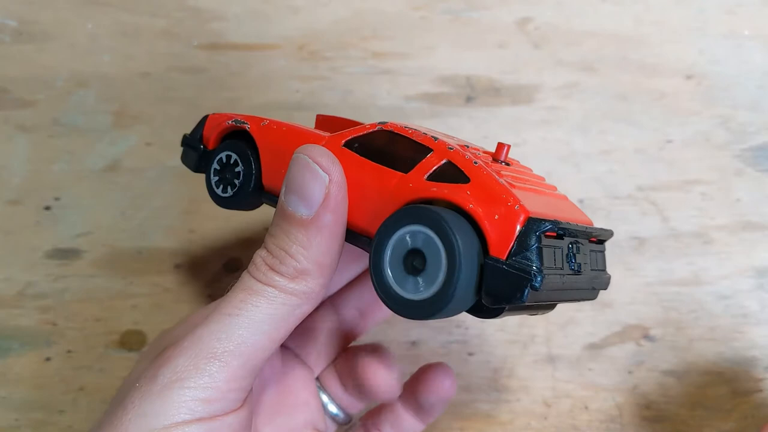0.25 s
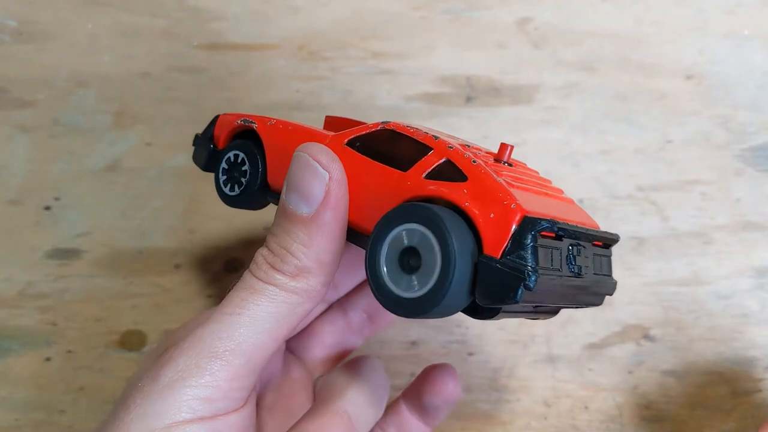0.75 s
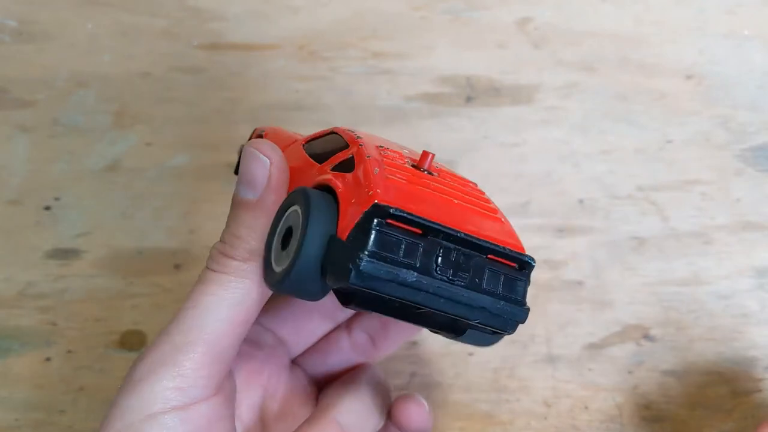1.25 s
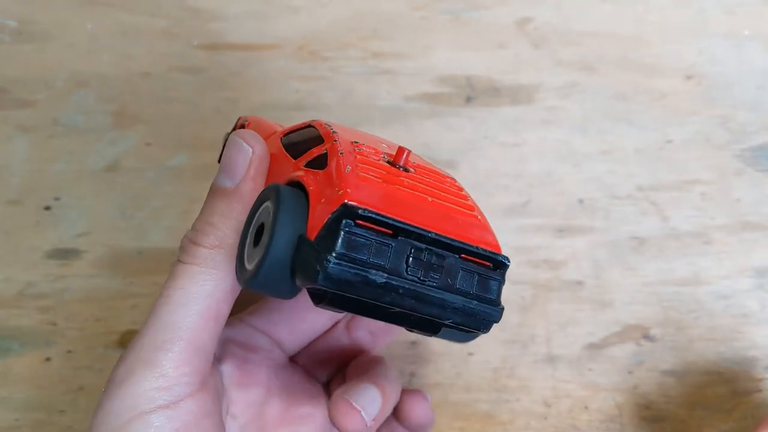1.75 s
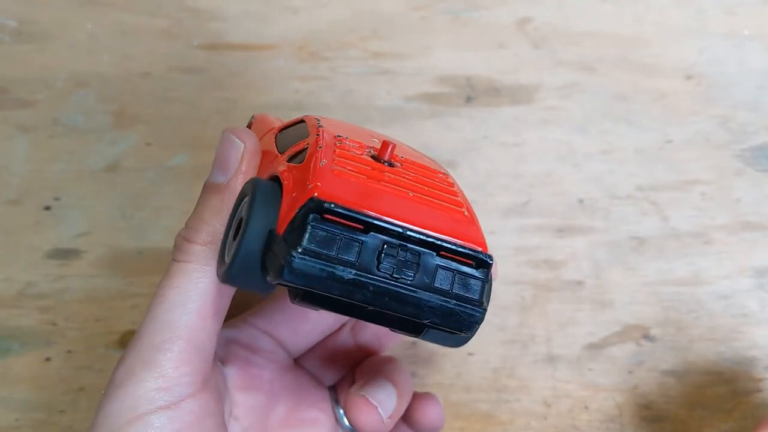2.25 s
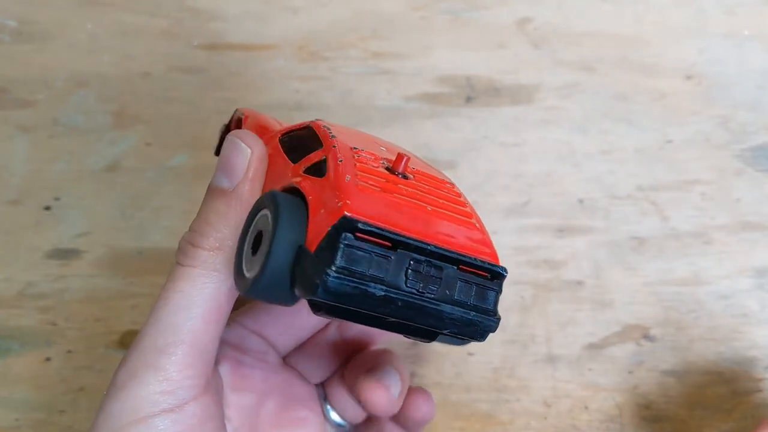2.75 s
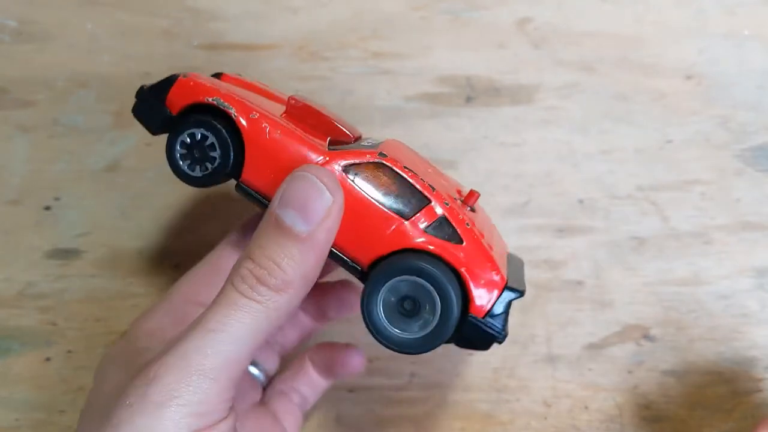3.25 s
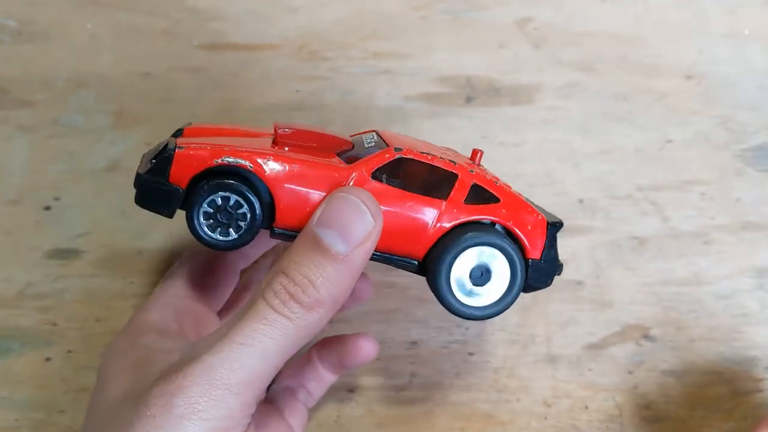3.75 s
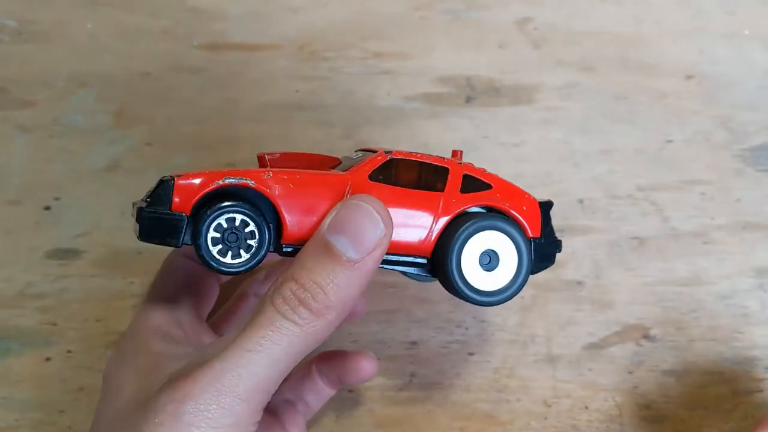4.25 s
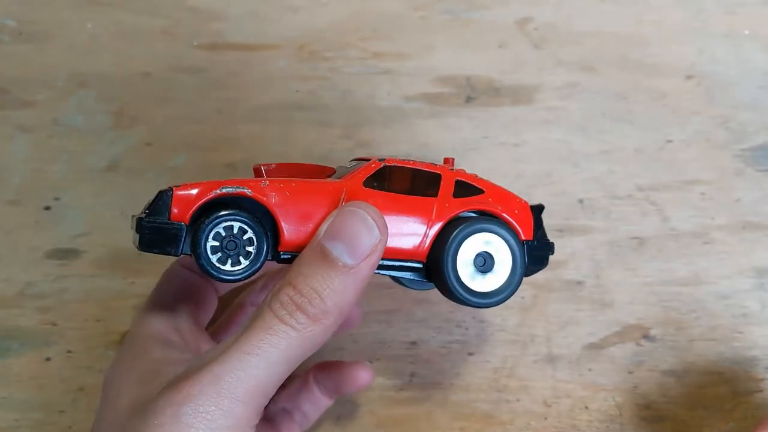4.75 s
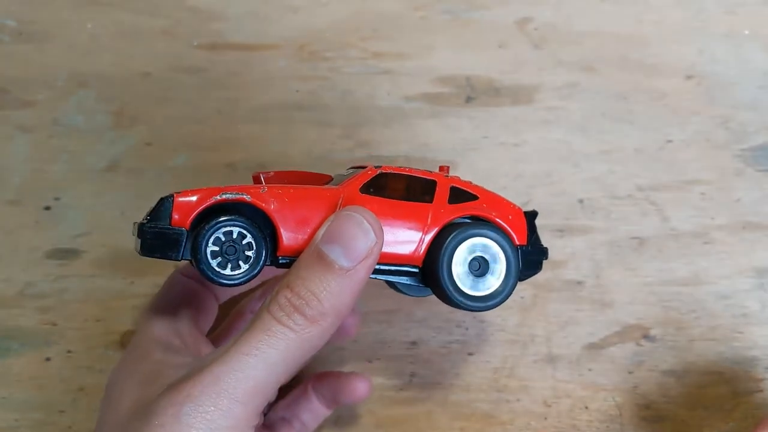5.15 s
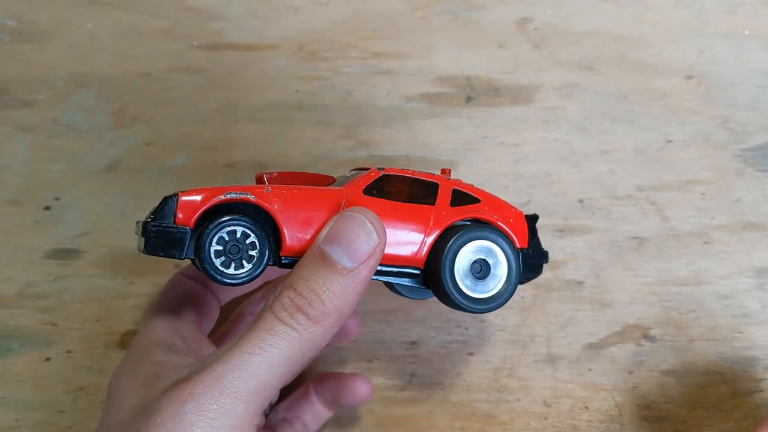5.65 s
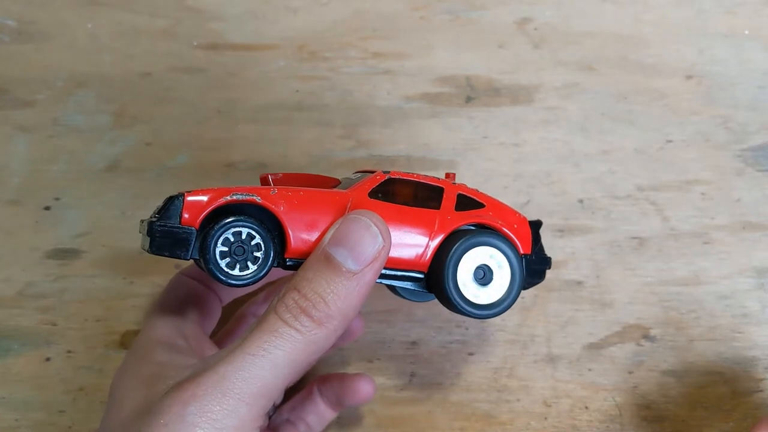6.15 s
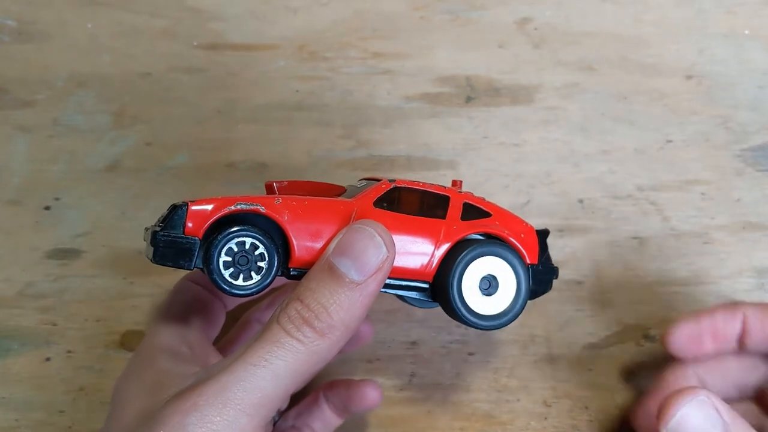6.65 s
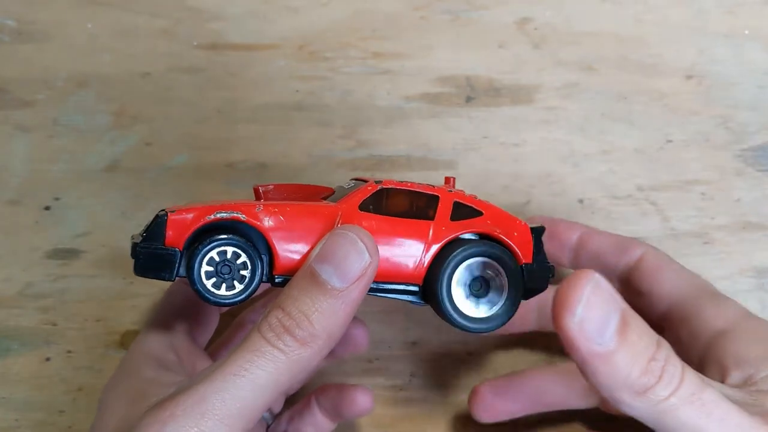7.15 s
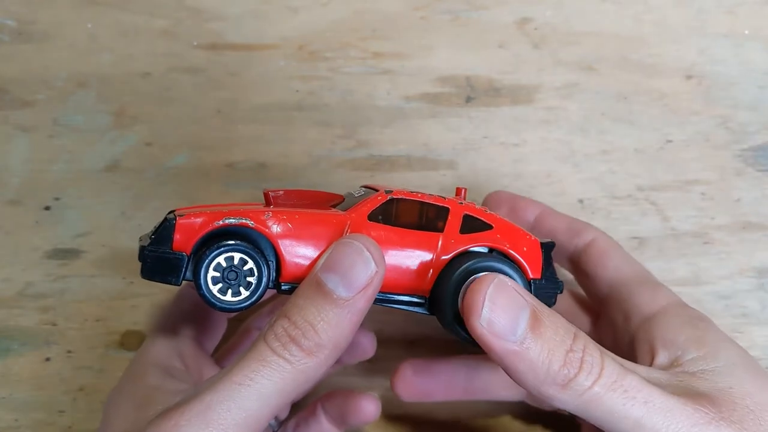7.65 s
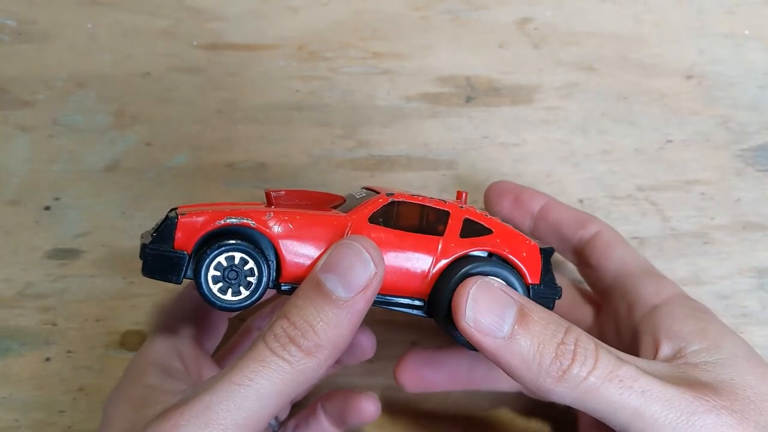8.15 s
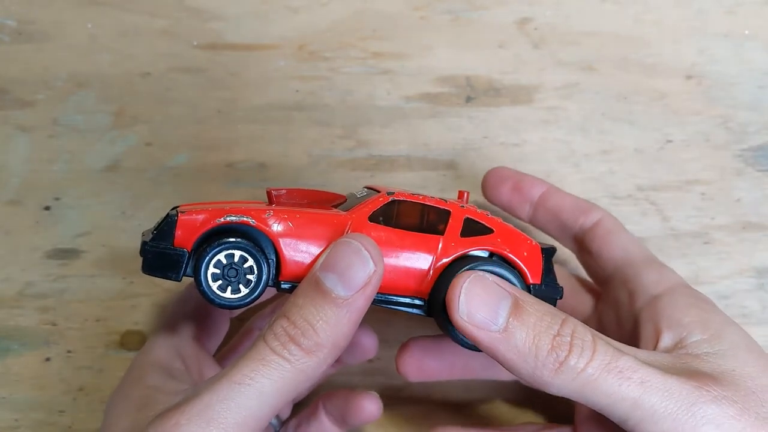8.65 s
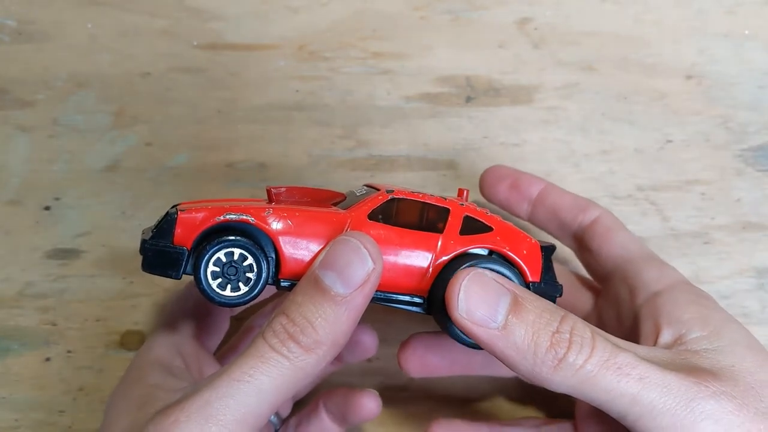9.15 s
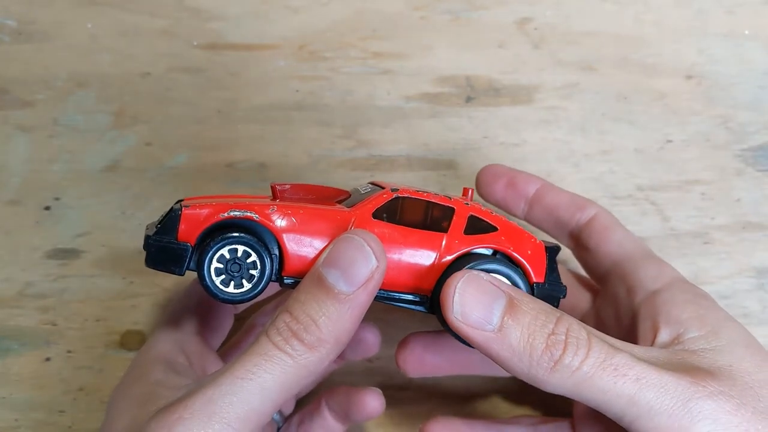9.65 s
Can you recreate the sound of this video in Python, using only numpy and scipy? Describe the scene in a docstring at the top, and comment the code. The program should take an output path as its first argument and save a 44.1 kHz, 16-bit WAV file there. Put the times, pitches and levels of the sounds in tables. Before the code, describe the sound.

Already spinning fast at the start, small plastic gears in a toy car give a piercing, rough whirr with a fizzy top. The pitch glides down without a break for several seconds, swelling here and there as it passes through resonances of the shell and the car is tilted. Finally a soft thumb on the tyre slows it, and the sound sinks to a faint low whirr. Close stereo pickup, dry indoor space, faint low rumble.

```python
"""The gear whine of a hand-held toy car's friction flywheel glides down indoors until a thumb brakes the wheel.
A slightly eccentric 27-tooth gear whines at its mesh rate and overtones, through fixed resonances and nulls.
Noise bursts at every tooth make rattle and scrape; uneven teeth add lines at multiples of the shaft rate.
The flywheel hums once a turn and the thumb rubs the tyre with soft low noise.
The room adds a short tail, a low rumble and a very deep drone that comes and goes."""
import sys
import numpy as np
from scipy import signal
from scipy.fft import rfft, irfft, next_fast_len
from scipy.io import wavfile
from scipy.ndimage import map_coordinates

SR = 44100
rng = np.random.default_rng(int(sys.argv[2]) if len(sys.argv) > 2 else 0)


def generate_wav(sig):
    """Save sig (samples, or channels by samples) to the path in sys.argv[1] as 16-bit PCM at SR."""
    pcm = np.round(np.clip(np.atleast_2d(sig).T, -1, 1) * 32767).astype(np.int16)
    wavfile.write(sys.argv[1], SR, pcm)


N = 436149

TEETH = 27  # on the coasting gear
# the hand turns the car: (t/s, view from 0 = rear towards the microphones to 1 = side)
FACING_CURVE = [(0, 0.59), (1, 0.54), (1.3, 0.45), (2.8, 0.057), (3.3, 0.39), (4.2, 0.94), (9.89, 0.76)]


def amp(db):
    """Amplitude factor of a level in dB."""
    return 10 ** (np.asarray(db) / 20)


def unit(x):
    """x scaled to an RMS of one."""
    return x / np.sqrt(np.mean(x ** 2) + 1e-20)


def along(points, hz):
    """Interpolate (f/Hz, value) points on a log frequency axis."""
    f, v = np.transpose(points)
    return np.interp(np.log(hz + 1), np.log(f + 1), v)


def curves(rows):
    """One value per sample for each column after the time."""
    s, *cols = np.transpose(rows)
    return [np.interp(np.arange(N) / SR, s, c) for c in cols]


def wobble(rate):
    """A smooth random curve with rate knots a second."""
    at = np.arange(0, N + 16, 16)  # a point every 16 samples is smooth enough
    knots = rng.standard_normal(int(N * rate / SR) + 4)
    return np.interp(np.arange(N), at, map_coordinates(knots, [at * rate / SR]))


def swell(centre_s, half_length_s):
    """A smooth Gaussian rise and fall, peaking at one."""
    t = np.arange(N) / SR
    return np.exp(-((t - centre_s) / half_length_s) ** 2)


def peak(hz, centre, width):
    """A resonance bump of height one, half as high at the edges of its width."""
    return 1 / (1 + (2 * (hz - centre) / width) ** 2)


def band(hz, centre, spread):
    """A Gaussian band of height one."""
    return np.exp(-.5 * ((hz - centre) / spread) ** 2)


def filtered(x, response):
    """x shaped by a response of frequency."""
    m = next_fast_len(N + SR // 4)
    return irfft(rfft(x, m) * response(np.fft.rfftfreq(m, 1 / SR)), m)[..., :N]


def pair(alike):
    """Two white noises that share the fraction alike of their power."""
    share = np.clip(alike, 0, 1)
    common = np.sqrt(share) * rng.standard_normal(N)
    return common + np.sqrt(1 - share) * rng.standard_normal((2, N))


def random_phase(turns):
    """The angle in radians of a running count of turns, from a random start."""
    return 2 * np.pi * ((turns + rng.random()) % 1).astype(np.float32)


def cycle(turns):
    """A cosine of a running count of turns, from a random start."""
    return np.cos(random_phase(turns))


def in_room(x, tail_db):
    """Direct sound plus a decaying noise tail that differs at each microphone."""
    # reverberation time: (f/Hz, time to fall by 60 dB/s)
    decay_times = [(300, 0.31), (2000, 0.16), (12000, 0.078)]
    hz, t, z = signal.stft(rng.standard_normal((2, SR // 3)), SR, nperseg=256)
    decay = amp(-60 * t / along(decay_times, hz)[:, None])
    tail = signal.istft(z * decay, SR, nperseg=256)[1]
    answer = amp(tail_db) * tail / np.linalg.norm(tail[0])
    answer[:, 0] += 1  # direct sound
    answer = answer / np.linalg.norm(answer[0])
    return signal.fftconvolve(np.atleast_2d(x), answer, axes=1)[:, :N]


def background():
    """Low rumble of the room: coloured noise, nearly the same at both microphones."""
    # rumble colour: (f/Hz, relative level/dB)
    colour = [(15, -3), (27, 0), (44, -5.5), (65, -3), (100, -12), (170, -31), (215, -27.5), (270, -26),
              (400, -31), (1000, -31), (15000, -45)]
    # how loud the rumble is: (t/s, level/dB)
    loudness = [(0, -58), (2.2, -56), (4.5, -58.5), (6.7, -58.5), (9, -55), (9.6, -55), (9.89, -49.5)]
    level_db, = curves(loudness)
    return amp(level_db) * unit(filtered(pair(alike=0.9), lambda hz: amp(along(colour, hz))))


def drone(drone_hz=27):
    """A narrow tone at the very bottom, wavering in pitch and level, the same at both microphones."""
    # the drone comes and goes: (t/s, level before its wavering/dB)
    loudness = [(0, -68), (1.7, -70), (1.98, -51), (2.4, -70.5), (3.6, -59), (5.8, -51), (6.8, -69),
                (9.89, -70)]
    level_db, = curves(loudness)
    tone = unit(cycle(drone_hz * np.arange(N) / SR + 0.12 * wobble(3.05)))
    return amp(level_db + 1.8 * wobble(4.07)) * tone


def flywheel(teeth, pinion_teeth=7):
    """The unbalanced flywheel sits on the small pinion and hums once per turn."""
    # unbalance hum: (t/s, level/dB)
    loudness = [(0, -73), (2.8, -84), (3.4, -70), (3.9, -64.5), (4.4, -67), (5.2, -75), (6, -93),
                (9.89, -78)]
    hum_db, = curves(loudness)
    return amp(hum_db) * unit(cycle(teeth / pinion_teeth))


def thumb(rub_hz=221, spread_hz=47):
    """Skin on the turning rubber tyre: soft swells of low noise."""
    # dull rubs: (t/s, half length/s, peak level/dB)
    rubs = [(7.3, 0.18, -74), (9.7, 0.76, -70.5)]
    press = sum(amp(db) * swell(s, length) for s, length, db in rubs)
    return press * unit(filtered(rng.standard_normal(N), lambda hz: band(hz, rub_hz, spread_hz)))


def backlash(speed):
    """At speed the gear jitters within its free play (in teeth), which blurs the highest partials most."""
    return .12 * speed ** 3.5 * wobble(260)


def tilt_load():
    """Tilting the spinning flywheel presses the gears together: smooth swells of all three gear sounds."""
    # tilts: (t/s, half length/s, whine lift/dB, rattle lift/dB, scrape lift/dB)
    tilts = [(1.466, 0.13, 2.5, 1.6, 4), (3.707, 0.65, 2.5, 1.5, -1)]
    return sum(np.outer(lifts_db, swell(s, length)) for s, length, *lifts_db in tilts)


def contact_db(law, mesh_hz, stall_hz=346.3):
    """Tooth noise weakens as the gear slows and collapses below stall_hz, where teeth stop striking."""
    full_db, octave_db, side_db = law
    side, = curves(FACING_CURVE)
    stall_db = -10 * np.log10(1 + (stall_hz / mesh_hz) ** 6)
    return full_db + octave_db * np.log2(mesh_hz / mesh_hz.max()) + side_db * side + stall_db


def tooth_contacts(teeth, alike, bite, sway_db, rough_db):
    """Noise that bursts at every tooth, swells once a turn and varies from blow to blow."""
    force = amp(sway_db * cycle(teeth / TEETH) + rough_db * wobble(500) + 0.65 * wobble(20))
    return unit(pair(alike) * force * (1 + bite * cycle(teeth)))


def scrape(teeth):
    """Tooth flanks slide over one another with a bright hiss."""
    # colour of the sliding teeth: (f/Hz, relative level/dB)
    colour = [(3000, -56), (5500, -1), (6500, -4.5), (7400, 1), (8300, -4.5), (9100, -2), (9800, 3),
              (10800, -5), (11900, -0.5), (12800, -4), (14400, 1.5), (15600, -2.5)]
    slides = tooth_contacts(teeth, alike=0.081, bite=0.48, sway_db=0.5, rough_db=1.3)
    heard = in_room(slides, tail_db=-4)
    return unit(filtered(heard, lambda hz: amp(along(colour, hz))))


def error_lines(teeth, mesh_hz, speed, best_hz=1250, rolloff=0.43):
    """Uneven teeth sing at multiples of the shaft rate; the small shell cannot radiate the low ones."""
    # tooth errors that repeat every turn:
    # (multiple of the shaft rate, relative level before radiation and speed/dB)
    tooth_errors = [(9, -1), (10, 4.5), (12, -3), (13, 2.5), (14, 3), (15, -0.4), (17, 2.5), (18, 3.5),
                    (19, -4.5), (20, -11), (21, 3), (22, -4.5), (23, -9), (24, -2.5), (25, 4), (29, 4.5),
                    (31, 1), (36, -11), (37, -5), (39, -13), (40, 1.5), (41, -10), (45, -16), (48, 4.5)]
    shaft, shaft_hz = teeth / TEETH, mesh_hz / TEETH
    fine = [(order, -8 + 2 * rng.standard_normal()) for order in range(56, 78, 2)]
    lines = np.zeros(N)
    for order, db in tooth_errors + fine:
        hz = order * shaft_hz
        radiated = np.clip((hz - 780) / 380, .05, 1)
        # bouncing teeth follow the fine errors less closely
        followed = np.minimum(best_hz / hz, 1) ** (rolloff * speed)
        lines += amp(db + wobble(10)) * radiated * followed * cycle(order * shaft)
    # scale the lines to the noise power in one shaft-rate band, stronger at speed
    return lines * 2 * np.sqrt(shaft_hz / SR) * amp(1.0 + 1.77 * speed)


def shell(x):
    """The plastic shell's resonances, cross-faded between its rear and its side as the car turns."""
    # broad response of the shell: (f/Hz, relative level/dB)
    broad = [(160, -40), (290, -16), (400, -25), (510, -19), (650, -21), (800, -8.5), (920, -7.5),
             (1050, -8), (1500, -5), (2500, -4.5), (3200, -3), (4100, -0.5), (4750, -5.5), (5600, 1.5),
             (6500, -7.5), (9000, -19)]
    # panel resonances: (f/Hz, width/Hz, lift from the rear/dB, lift from the side/dB)
    panels = [(1046, 54, 11, -2), (1272, 300, 11.5, 1), (1485, 97, 4, 0), (1641, 44, 16.5, 12.5),
              (1640, 52, -10, -5), (2060, 106, 6.5, 7), (2254, 99, 8.5, 6), (3010, 180, 1, 7.5),
              (3236, 93, 2, 7), (3426, 38, -2, 12), (4040, 130, -2, 1.5)]

    def view(column):
        def response(hz):
            lift_db = sum(db[column] * peak(hz, centre, width) for centre, width, *db in panels)
            return amp(along(broad, hz) + lift_db)
        return filtered(x, response)

    side, = curves(FACING_CURVE)
    return unit((1 - side) * view(0) + side * view(1))


def rattle(teeth, mesh_hz, speed, flex_db=5, flex_hz=1250, flex_spread_hz=210):
    """Random tooth blows and the errors that repeat each turn drive the shell."""
    blows = tooth_contacts(teeth, alike=0.44, bite=0.6, sway_db=1.16, rough_db=2.0)
    sound = shell(in_room(blows + error_lines(teeth, mesh_hz, speed), tail_db=-4))
    # at speed the heavy flywheel also flexes the large, low panels, which both microphones hear alike
    low = filtered(sound.mean(axis=0), lambda hz: band(hz, flex_hz, flex_spread_hz))
    return sound + (amp(flex_db * speed - 1.5) - 1) * low


def radiated_db(hz, side):
    """Level at the left and right microphone of a partial gliding through the resonances at hz."""
    # how loudly the shell radiates a mesh partial, before its resonances: (f/Hz, level/dB)
    radiation = [(250, -110), (450, -86), (650, -74), (850, -59), (1250, -45.5), (2100, -41), (4000, -35),
                 (4800, -44.5), (5700, -37), (7200, -40.5), (8300, -54), (9900, -37.5), (10900, -46),
                 (12000, -36.5), (15000, -41)]
    # resonances and nulls on the way: (f/Hz, width/Hz, left gain/dB, right gain/dB)
    resonances = [(1260, 177, 10.5, 4), (1426, 105, -4, -4.5), (1513, 94, 6.5, 5.5), (1648, 40, 5.5, 12),
                  (1880, 44, 4.5, 11.5), (2062, 103, 11.5, 6.5), (2286, 110, 4, 9), (2445, 38, 3.5, 7.5),
                  (2465, 99.3, -3.5, -1.5), (2544, 40, 5.5, 5.5), (2795, 80, -2.5, -1), (2880, 35, 2, 4),
                  (3023, 150, 6.5, 7.5), (3360, 90, -5.5, -4)]
    # bands the car's flank beams as it turns to the microphones: (f/Hz, width/Hz, gain at full side/dB)
    flank_bands = [(2520.5, 420, -5), (3520, 710, 5), (5430, 380, 6), (10000, 3300, -5)]
    grid = np.linspace(0, SR / 2, 4096)
    ears = along(radiation, grid) + sum(
        np.outer(ears_db, peak(grid, centre, width)) for centre, width, *ears_db in resonances)
    flank = sum(db * peak(grid, centre, width) for centre, width, db in flank_bands)
    return np.array([np.interp(hz, grid, ear) for ear in ears]) + side * np.interp(hz, grid, flank)


def mesh_tone(teeth, shaft, swing, lean, flutter, flutter_rate):
    """One partial at both microphones: eccentricity swings it once a turn, backlash makes it flutter."""
    angle, turn = random_phase(teeth), random_phase(shaft)
    # sidebands one shaft rate above and below; lean is the lower one's share of the upper
    sides = swing * (np.cos(angle + turn) + lean * np.cos(angle - turn)) * amp(3.7 * wobble(20))
    bounce = np.array([wobble(flutter_rate) * np.cos(angle) + wobble(flutter_rate) * np.sin(angle)
                       for ear in range(2)])
    tone = np.cos(angle) * amp(1.86 * wobble(32)) + sides + flutter * bounce
    return tone / np.sqrt(1 + swing ** 2 * (1 + lean ** 2) + 2 * flutter ** 2)


def whine(teeth, mesh_hz, speed, ripple_db=1.1, ripple_rate=9):
    """The mesh tone and overtones glide through resonances; the faster the gear, the more its teeth bounce."""
    # once-a-turn throb, strongest as the thumb loads the gears:
    # (t/s, upper sideband's share of the first partial)
    throb = [(0, 0.6), (1.5, 0.45), (3.2, 0.45), (3.8, 0.2), (6.8, 0.38), (7.7, 0.4), (8.4, 0.7),
             (9.89, 0.35)]
    # partials: (multiple of the mesh rate, gain at full speed/dB, gain per octave of speed/dB)
    partials = [(1, 3, -2.4), (2, 1.6, 1.6), (3, 2.3, 5.3), (4, -2.5, 4)]
    swing, = curves(throb)
    side, = curves(FACING_CURVE)
    shaft = teeth / TEETH
    gains = []
    for order, db, octave_db in partials:
        # slow wavering, separate at each microphone
        ripple = ripple_db * np.array([wobble(ripple_rate), wobble(ripple_rate)])
        gains.append(amp(db + octave_db * np.log2(speed) + radiated_db(order * mesh_hz, side) + ripple))
    first = mesh_tone(teeth, shaft, swing, lean=0.19, flutter=0.21 + 0.14 * speed ** 3, flutter_rate=120)
    # at speed the mesh loses and regains contact some thirty times a second
    first = first * amp(3 * speed ** 3 * wobble(55) - speed ** 6)
    upper = np.zeros((2, N))
    for k, gain in enumerate(gains[1:], 2):
        flutter = .25 + .25 * k * speed ** 3
        upper += gain * mesh_tone(k * teeth, shaft, 1.28 * swing, lean=0.21,
                                  flutter=flutter, flutter_rate=70 * k)
    return gains[0] * first + in_room(upper, tail_db=-3.5)


def scene():
    """One falling gear speed drives whine, rattle, scrape and hum; the car is a little nearer the left mic."""
    # the coasting gear, braked by the thumb from 8.3 s: (t/s, teeth meeting per second/Hz)
    coast = [(0, 3611), (0.6, 3370), (1.25, 3143), (1.5, 3003), (1.75, 2900), (2.4, 2717), (3, 2562),
             (3.5, 2404), (4.25, 2172), (5.1, 1898), (6, 1627), (6.8, 1406), (7.5, 1234), (8.28, 1038),
             (8.85, 817.7), (9.25, 623.3), (9.8, 301), (9.89, 261)]
    # tooth noise laws: (level at full speed/dB, gain per octave of speed/dB, gain from the side/dB)
    rattle_law = (-31.5, 3.38, 0.3)
    scrape_law = (-33.5, 7.23, 3.54)
    mesh_hz, = curves(coast)
    speed = mesh_hz / mesh_hz.max()
    teeth = np.cumsum(mesh_hz) / SR + backlash(speed)  # running count of teeth met
    whine_lift_db, rattle_lift_db, scrape_lift_db = tilt_load()
    load_db = 0.5 * wobble(40)  # the wobbling axle presses the teeth together unevenly
    bounce_db = 2 * speed ** 8  # extra scrape while the teeth bounce near full speed
    rattle_db = contact_db(rattle_law, mesh_hz) + rattle_lift_db + load_db
    scrape_db = contact_db(scrape_law, mesh_hz) + bounce_db + scrape_lift_db + load_db
    # the column pairs are left and right balance in dB
    body = amp(rattle_db) * amp([[.5], [-.5]]) * rattle(teeth, mesh_hz, speed)
    hiss = amp(scrape_db) * amp([[1.2], [-1.4]]) * scrape(teeth)
    tone = amp(whine_lift_db) * whine(teeth, mesh_hz, speed)
    left, right = tone + body + hiss + flywheel(teeth) + thumb()
    late_right = np.pad(right, (4, 0))[:N]  # the car's sound arrives 4 samples later on the right
    return np.array([left, late_right]) + background() + drone()


def record(dry, top_hz=15720):
    """A sharp band limit: nothing passes from top_hz upwards."""
    return filtered(dry, lambda hz: hz < top_hz)


dry = scene()
out = record(dry)
generate_wav(out)
```